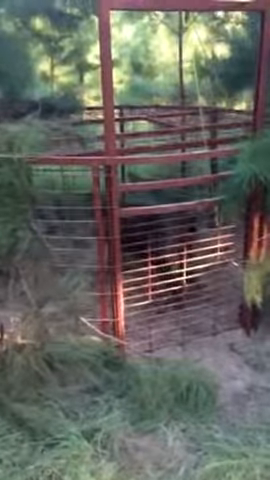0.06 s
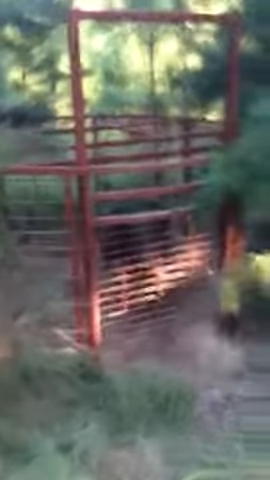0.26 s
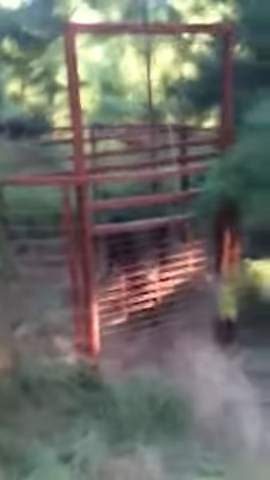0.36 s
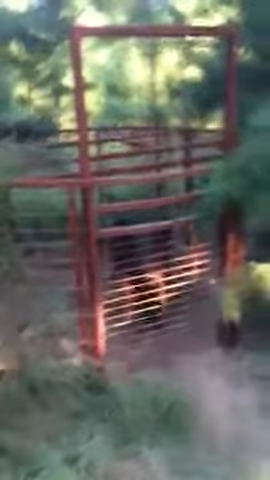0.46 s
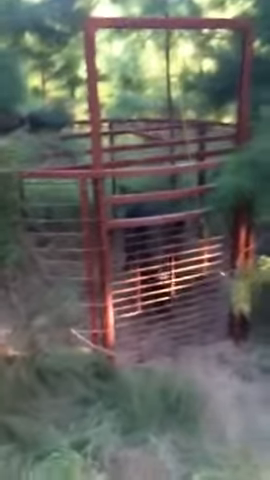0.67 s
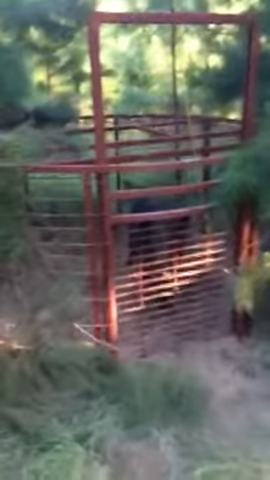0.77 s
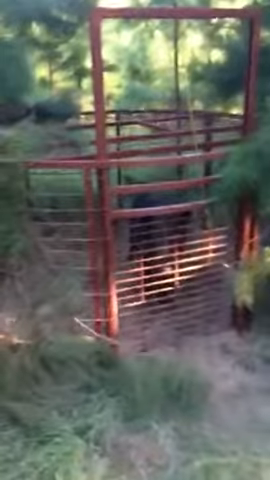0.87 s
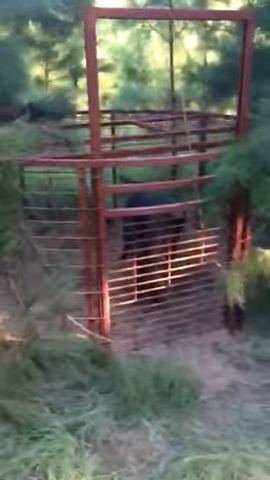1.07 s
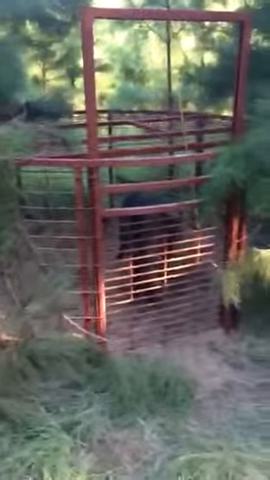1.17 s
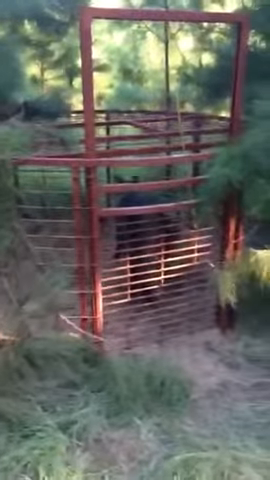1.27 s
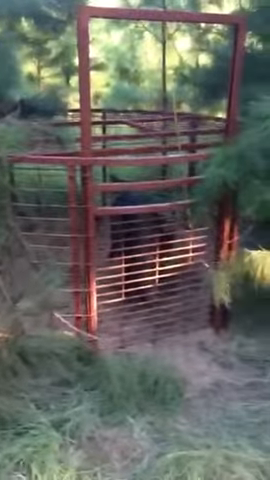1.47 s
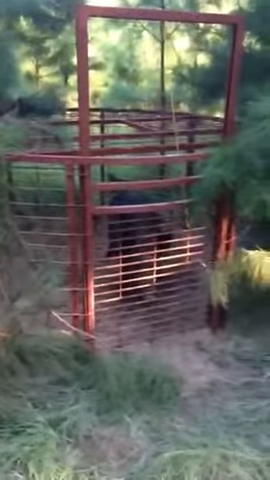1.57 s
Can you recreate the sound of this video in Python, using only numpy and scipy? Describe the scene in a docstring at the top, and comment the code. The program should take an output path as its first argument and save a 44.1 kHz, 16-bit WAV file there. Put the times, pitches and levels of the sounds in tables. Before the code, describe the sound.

A wild hog snorts over rustling dry grass, then charges the wire gate of its steel pen with a loud barking grunt. The mesh clashes, the ground thuds, and the hog backs off huffing, a few metres away outdoors.

```python
"""A short, throaty knock and snorts sound over rustling litter; then a wild hog growls and charges the
wire-mesh gate of its steel pen, barking a grunt as it hits. The mesh clashes and rings, the ground
thuds, and the hog backs off, huffing. The voice is turbulence and throat pulses shaped by airway
resonances; the gate is struck steel in damped vibration; the litter is many tiny contacts. It is heard
outdoors from a few metres away, with a faint echo from the trees."""
import sys
import numpy as np
from scipy import signal
from scipy.fft import rfft, irfft, next_fast_len
from scipy.io import wavfile
from scipy.ndimage import uniform_filter1d, map_coordinates

SR = 44100
rng = np.random.default_rng(int(sys.argv[2]) if len(sys.argv) > 2 else 0)


def unload_audio(sound):
    """Save the sound as a 16-bit wav file, at the path given as the first command line argument."""
    columns = np.transpose(np.atleast_2d(sound))
    # keep every value between -1 and 1, then stretch to whole-number steps
    steps = np.round(np.clip(columns, -1, 1) * 32767)
    wavfile.write(sys.argv[1], SR, steps.astype(np.int16))


N = 70560

RUSTLE_LEVELS = [(0, -48), (.16, -51.5), (.54, -57), (.65, -55.5), (.69, -51), (.73, -51), (.79, -48.5),
                 (.86, -52.5), (.95, -57.5), (1.03, -62), (1.1, -66.5), (1.17, -63), (1.25, -70),
                 (1.6, -73.5)]  # scuffling in dry litter: t/s, level/dB
LITTER_SPECTRUM = [(150, -52), (250, -22), (287, -6.5), (346, -8), (471, -4.5), (620, -2.5), (788, -2.5),
                   (873, 1.5), (1560, -6.5), (2130, -1.5), (3050, -12), (4520, -11.5), (15000, -46)]  # crunch of grass and dirt: f/Hz, level/dB
RUMBLE_LEVELS = [(0, -46.5), (.18, -41.5), (.23, -36.5), (.3, -37.5), (.43, -46.5), (.5, -49), (.62, -54.5),
                 (.9, -57), (1.1, -63.5), (1.6, -62.5)]  # course of the low rumble: t/s, level/dB
GROUND_SPECTRUM = [(20, -33.5), (32, -26), (52, 7), (90, 0), (150, -5), (230, -12), (320, -17.5),
                   (500, -55.5)]  # colour of the rumble: f/Hz, level/dB
SNORT_BLASTS = [(.002, 0.014, -48), (0.06, 0.022, -31.5), (0.084, 0.047, -39.5)]  # blasts of air: t/s, length/s, level/dB
SNOUT_SPECTRUM = [(150, -37), (250, -1.5), (352, -21), (418, 2.5), (479, -5.5), (788, 2), (858, 0.5),
                  (984, 2), (1510, -5.5), (2130, 4), (2360, -10.5), (2900, -1.5), (3270, -21.5),
                  (3810, -11), (4840, -12), (5190, -20.5), (15000, -52.5)]  # resonances of the snout: f/Hz, level/dB
# a short, throaty opening grunt or knock (first two rows), then wires striking the frame:
# t/s, peak level/dB, f/Hz
KNOCK_EVENTS = [(.008, -34, 665), (.009, -34, 1080), (.081, -26, 4200), (.1025, -31, 3700),
                (.118, -28.5, 3850), (.1235, -33, 4300), (.1945, -26, 1600), (.2105, -34, 3900),
                (.2715, -19, 1900), (.2735, -25, 4300), (.2855, -21, 2650), (.329, -31, 5500),
                (.3525, -22, 2000), (.386, -36, 3500), (.411, -32, 2000), (.441, -43, 3000),
                (.5232, -42, 2900)]
GROUND_BLOWS = [(.01, -40.5, 126), (0.086, -29, 77.4), (0.113, -27.5, 99), (0.173, -27.5, 95.4),
                (0.193, -27.5, 131.8), (.212, -27, 82.6), (0.223, -20.5, 151.2), (0.365, -28.5, 85),
                (.463, -23.5, 78.1), (0.474, -24.5, 119), (0.487, -33, 49.7), (0.522, -31, 170),
                (0.543, -46, 46.7), (0.566, -43, 61), (0.699, -44, 91), (0.905, -54, 65.5),
                (1.19, -49.5, 110), (1.211, -45.5, 110)]  # impacts of hooves and body: t/s, level/dB, f/Hz
STALK_SNAPS = [(0.028, -44, 8600, 1.2), (0.5227, -43, 2280, 0.88), (.711, -43.5, 4600, 0.61),
               (0.7219, -41, 2900, .75), (0.8676, -34, 4100, 0.58), (.937, -44, 5030, 0.18),
               (0.9895, -43.5, 4480, 0.35), (1.2873, -40.5, 1300, 1.7), (1.399, -45, 2580, 1.14)]  # breaking stalks: t/s, peak level/dB, f/Hz, width/octaves
WIRE_SLIPS = [(0.089, 0.011, -51, 3730), (0.093, 0.022, -50, 4400), (0.563, 0.061, -65.5, 4440)]  # wires scraping on steel: t/s, length/s, level/dB, f/Hz
HUFF_BREATHS = [(0.163, 0.082, -38.5, 0.0087, 0.94), (0.206, 0.019, -25.5, 0.0018, 1.06),
                (0.231, 0.0065, -29, 0.0038, 0.82), (0.363, 0.0037, -33, 0.005, 0.57),
                (0.753, 0.065, -48.5, 0.0051, 1.074), (0.993, 0.037, -55.5, 0.0034, 0.89),
                (1.123, 0.062, -64.5, 0.02, 0.98), (1.181, 0.017, -53, 0.015, 1.01)]  # throaty breaths: t/s, length/s, level/dB, attack/s, frequency ratio
THROAT_SPECTRUM = [(100, -26), (220, -12), (330, -24), (470, -6), (570, 0), (660, -1), (790, -14),
                   (1200, -17), (1550, -14), (1900, -20), (3000, -36), (8000, -58), (15000, -80)]  # resonances of the throat: f/Hz, level/dB
# pushes against the mesh: t/s, length/s, level/dB, attack/s, tilt/(dB per octave)
MESH_SHOVES = [(.165, 0.071, -40, .0083, 0.5), (.2635, 0.0052, -21, .007, -1),
               (.268, 0.028, -23, .0032, 1.5), (.304, 0.046, -30, .016, 3), (.368, 0.028, -42.5, .004, 2.5),
               (.556, .014, -58, .0034, -0.5)]
MESH_SPECTRUM = [(150, -30.5), (330, -5.5), (520, 5), (800, -1), (1100, 2), (1400, -4.5), (1850, 3),
                 (2150, -3.5), (2700, -4.5), (3250, -12), (4500, -11.5), (5600, -20.5), (8000, -33),
                 (12000, -50.5), (15500, -61)]  # clashing wires: f/Hz, level/dB
BAR_MODES = [(529, -8, .35), (840, -11, .28), (1338, -3, .33), (1636, -2, .28), (1681, 0, .22),
             (1807, -6, .3), (1909, -5, .28), (2002, -5, .28), (2261, -6, .28), (2541, -7, .27),
             (4328, -13, .2)]  # normal modes of the frame: f/Hz, level/dB, T60/s
WIRE_DECAY = [(300, .25), (1800, .36), (4400, .27), (6000, .19), (10000, .16)]  # ringing time of the wires: f/Hz, T60/s
HOOF_SCUFFS = [(0.171, 0.0072, -57, 2980, 1.5), (0.186, .014, -54.5, 5970, 0.28),
               (.564, 0.006, -51.5, 1140, 0.46), (0.6638, 0.0051, -42.5, 1370, 0.68),
               (0.673, 0.021, -53.5, 1770, 0.36), (0.997, .003, -56.5, 1295, 1.17),
               (1.164, 0.012, -64.5, 1840, 0.18), (1.526, .018, -68, 1150, .9)]  # hooves sliding in dirt: t/s, length/s, level/dB, f/Hz, width/octaves
# trains of throat pulses: t/s, first spacing/s, ratio of successive spacings, level/dB,
# final mouth closure (0-1), swell/(dB per pulse), frequency ratio
GRUNT_TRAINS = [(.1952, .0242, 1.15, -25.5, 0, 3.5, 1.044), (.2918, .0226, 0.84, -3.5, 0.9, -0.07, 0.99),
                (1.188, .007, 1.5, -44.5, .05, -2, 1.08)]
# vocal tract resonances: f/Hz, level/dB, level change/dB and fractional fall of f at full closure
GRUNT_FORMANTS = [(226.8, -12.5, -6, 0.05), (562.4, 0.5, -13, 0.32), (806, -23.5, 10.5, .05),
                  (1137, -20.5, 12, 0.02), (1214, -12, -0.5, 0), (2002, -26, -15.5, 0),
                  (2665, -34.5, -1.5, 0.12)]
TREE_DECAY = [(100, 0.12), (1000, 0.61), (8000, 0.17)]  # reverberation time among the trees: f/Hz, T60/s
AIR_SPECTRUM = [(88, -49.5), (150, -11), (480, -9.5), (910, -18), (1130, -7.5), (2180, -17.5), (2540, -3.5),
                (3900, -16), (5110, -12.5), (9150, -27), (15400, -30)]  # outdoor background: f/Hz, level/dB


def amp(db):
    """Amplitude ratio of a level in decibels."""
    return 10 ** (np.asarray(db) / 20)


def unit(x):
    """Normalisation to rms 1."""
    return x / np.sqrt(np.mean(x ** 2) + 1e-20)


def clock(start=0):
    """Seconds since start, zero before it."""
    return np.maximum(np.arange(N) / SR - start, 0)


def along(points, hz):
    """Interpolation of (f/Hz, value) points on a logarithmic frequency axis."""
    f, values = np.transpose(points)
    return np.interp(np.log(hz + 1), np.log(f + 1), values)


def level(rows):
    """Amplitude envelope through (t/s, level/dB) points."""
    return amp(np.interp(clock(), *np.transpose(rows)))


def filtered(x, response):
    """Linear filtering: the spectrum of x is multiplied by a frequency response."""
    size = next_fast_len(N + SR // 4)
    return irfft(rfft(x, size) * response(np.fft.rfftfreq(size, 1 / SR)), size)[:N]


def band(hz, centre, octaves):
    """Response of a resonance with steep skirts, octaves wide to either side."""
    return 1 / (1 + .5 * (np.log2((hz + 1) / centre) / octaves) ** 2) ** 2


def wobble(per_s):
    """Smooth random modulation through per_s values a second."""
    return map_coordinates(rng.standard_normal(N // 4), [clock() * per_s], mode="mirror")


def noise(spectrum, grain=0):
    """Coloured noise of rms 1; grain roughens it by random amplitude modulation."""
    clumps = np.exp(grain * np.clip(wobble(per_s=900), -2, 2))
    return unit(filtered(rng.standard_normal(N) * clumps, lambda hz: amp(along(spectrum, hz))))


def band_noise(hz, octaves):
    """Random excitation of one resonance, at rms 1."""
    return unit(filtered(rng.standard_normal(N), lambda f: band(f, hz, octaves)))


def burst(start, length, attack, t60):
    """Linear attack, hold and exponential decay of 60 dB in t60 seconds."""
    return np.minimum(clock(start) / attack, 1) * amp(-60 * clock(start + length) / t60)


def ring_out(x, t60s):
    """Convolution with a dense impulse response in which each frequency decays at its own rate."""
    hz, t, spectra = signal.stft(rng.standard_normal(SR // 2), SR, nperseg=256)
    tail = signal.istft(spectra * amp(-60 * t / along(t60s, hz)[:, None]), SR, nperseg=256)[1]
    return signal.fftconvolve(x, tail / np.linalg.norm(tail))[:N]


def litter_rustle():
    """Superposition: countless tiny contacts in dry grass and dirt add up to a grainy noise."""
    return level(RUSTLE_LEVELS) * noise(LITTER_SPECTRUM, grain=.25)


def ground_rumble():
    """Random low-frequency vibration of the ground swells with the charge and fades."""
    return level(RUMBLE_LEVELS) * noise(GROUND_SPECTRUM)


def snorts():
    """Turbulence: fluttering blasts of air excite the resonances of the snout."""
    blasts = sum(amp(db) * burst(start, length, attack=.013, t60=.1) for start, length, db in SNORT_BLASTS)
    flutter_db = 1.3
    return blasts * noise(SNOUT_SPECTRUM, grain=.35) * amp(flutter_db * wobble(per_s=220))


def knocks(mode_count=5, spread=.07, ring_t60=.032, crack_t60=.0105, rise_s=.0003):
    """Damped modes with a tiny crack: first a throaty grunt or knock, later wires hitting the frame."""
    out, t = np.zeros(N), np.arange(SR // 10) / SR
    for start, db, hz in KNOCK_EVENTS:
        modes_hz = hz * (1 + spread * rng.standard_normal((mode_count, 1)))
        phases = 2 * np.pi * (modes_hz * t + rng.random((mode_count, 1)))
        ring = unit(np.sin(phases).sum(0)) * amp(-60 * t / ring_t60)
        crack = .12 * amp(-60 * t / crack_t60) * uniform_filter1d(rng.standard_normal(len(t)), size=3)
        knock = (ring + crack) * (1 - np.exp(-t / rise_s))
        out[round(start * SR):][:len(t)] += amp(db) * knock / np.abs(knock).max()
    return out


def thuds(rise_cycles=.44, bend_cycles=.2):
    """Heavy damping: the ground answers each blow with a low cycle or two of falling frequency."""
    out = np.zeros(N)
    for start, db, hz in GROUND_BLOWS:
        cycles = clock(start) * hz
        age = cycles / rise_cycles
        phase = 2 * np.pi * (cycles + bend_cycles * (1 - np.exp(-age)))
        out -= amp(db) * age * np.exp(1 - age) * np.sin(phase)
    return out


def stalk_snaps(t60=.0105, cutoff_hz=8500):
    """Brittle fracture: each dry stalk releases a brief transient in its own frequency band."""
    out = np.zeros(N)
    for start, db, hz, octaves in STALK_SNAPS:
        t = clock(start)
        crack = rng.standard_normal(N) * (t > 0) * amp(-60 * t / t60)
        snap = filtered(crack, lambda f: band(f, hz, octaves) / np.hypot(1, (f / cutoff_hz) ** 2))
        out += amp(db) * snap / np.abs(snap).max()
    return out


def wire_squeals():
    """Frictional excitation: wire slips on steel and drives one narrow resonance."""
    return sum(amp(db) * burst(start, length, attack=.005, t60=.055) * band_noise(hz, octaves=.065)
               for start, length, db, hz in WIRE_SLIPS)


def huffs():
    """Cavity resonance: rough air sounds the throat, whose size scales the frequencies of each huff."""
    out = np.zeros(N)
    for start, length, db, attack, ratio in HUFF_BREATHS:
        throat = [(hz * ratio, gain_db) for hz, gain_db in THROAT_SPECTRUM]
        out += amp(db) * burst(start, length, attack, t60=.075) * noise(throat, grain=.35)
    return out


def mesh_clash(pivot_hz=1500):
    """Dense collisions: wires clash while the hog pushes, each shove tilting the noise spectrum."""
    out = np.zeros(N)
    for start, length, db, attack, tilt in MESH_SHOVES:
        spectrum = [(hz, gain_db + tilt * np.log2(hz / pivot_hz)) for hz, gain_db in MESH_SPECTRUM]
        out += amp(db) * burst(start, length, attack, t60=.081) * noise(spectrum, grain=.21)
    return out


def frame_ring(drive, rattle_rad=.7):
    """Modal response: the driven bars ring on while loose joints jostle the phase of each mode."""
    t = clock()
    bars = sum(amp(db - 60 * t / t60) * np.sin(2 * np.pi * hz * t + rattle_rad * wobble(per_s=70))
               for hz, db, t60 in BAR_MODES)
    return signal.fftconvolve(drive, bars / np.linalg.norm(bars))[:N]


def gate(wires_db=-11, frame_db=-20, chatter_db=1.8):
    """Forced vibration: clash and knocks set the wires ringing, and the clash also drives the frame."""
    clash = mesh_clash()
    knocking = knocks()
    frame = amp(frame_db) * frame_ring(clash)
    wires = amp(wires_db) * ring_out(clash + knocking, WIRE_DECAY)
    chatter = amp(chatter_db * wobble(per_s=190))  # the mesh chatters against its frame
    return knocking + (clash + wires + frame) * chatter


def hoof_scuffs():
    """Sliding friction: a hoof dragged through dirt gives a short band of noise."""
    return sum(amp(db) * burst(start, length, attack=.001, t60=.07) * band_noise(hz, octaves)
               for start, length, db, hz, octaves in HOOF_SCUFFS)


def grunts(pulses=3, rise_s=.0006, pulse_s=.0069, rasp_rad=.1):
    """Source and filter: slow, uneven throat pulses ring formants that shift as the mouth closes."""
    out = np.zeros(N)
    for start, spacing, stretch, db, closure, swell_db, ratio in GRUNT_TRAINS:
        for k in range(pulses):
            t = clock(start + spacing * np.sum(stretch ** np.arange(k)))
            closed = closure * k / (pulses - 1)
            puff = (1 - np.exp(-t / rise_s)) * np.exp(-(t / pulse_s) ** 2)
            for hz, formant_db, change_db, fall in GRUNT_FORMANTS:
                phase = 2 * np.pi * hz * ratio * (1 - fall * closed) * t + rasp_rad * wobble(per_s=700)
                gain = amp(db + k * swell_db + formant_db + change_db * closed ** 2)
                out += gain * puff * np.sin(phase)
    return out


def scene(dip_db=-4.5, trees_db=-25.5, air_db=-67.5):
    """Outdoor propagation: the ground reflection partly cancels one band, and the trees reverberate."""
    pen = snorts() + huffs() + grunts() + gate() + wire_squeals()
    pen += ground_rumble() + thuds() + litter_rustle() + hoof_scuffs() + stalk_snaps()
    arriving = filtered(pen, lambda hz: amp(dip_db * band(hz, centre=300, octaves=.23)))
    echo = amp(trees_db) * ring_out(arriving, TREE_DECAY)
    return (arriving + echo + amp(air_db) * noise(AIR_SPECTRUM))[None]


def record(dry):
    """Band limiting: the microphone passes nothing above 15.4 kHz."""
    return filtered(dry[0], lambda hz: hz < 15400)[None]


dry = scene()
out = record(dry)
unload_audio(out)
```